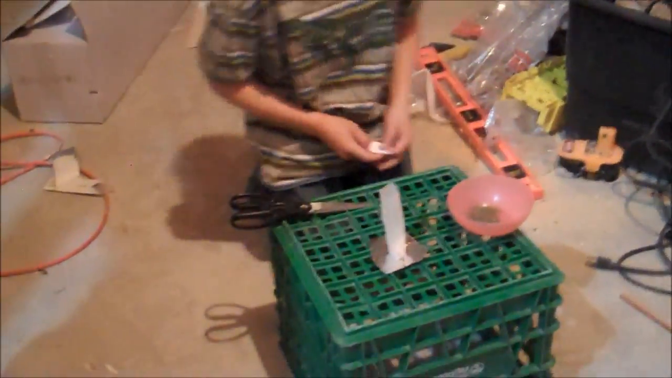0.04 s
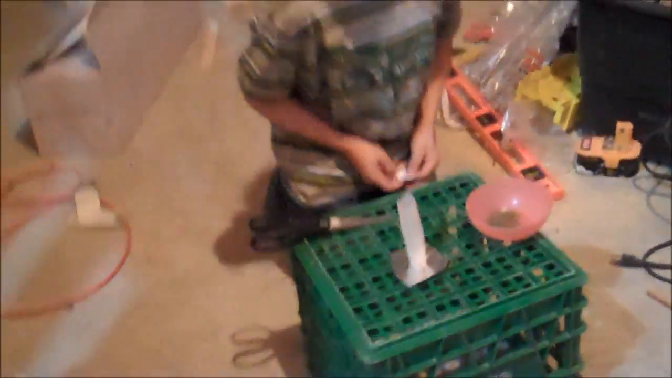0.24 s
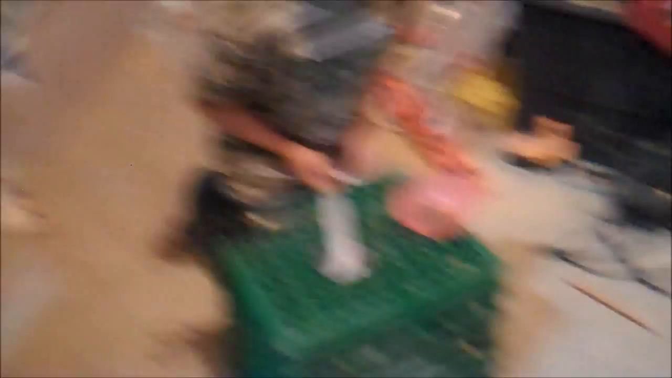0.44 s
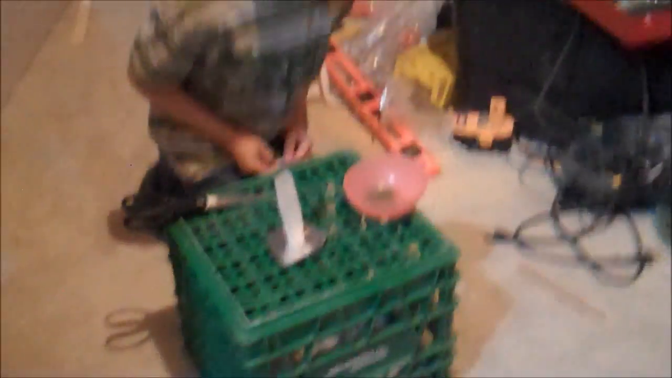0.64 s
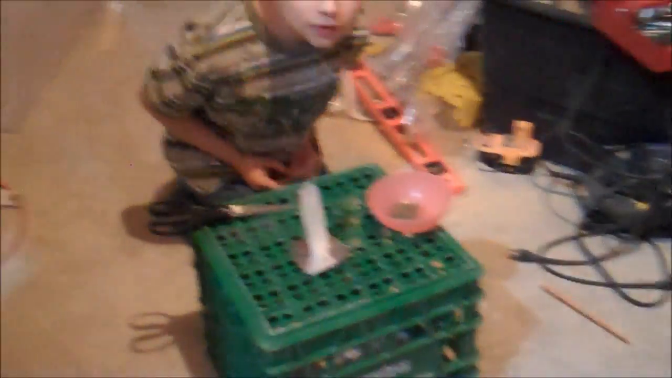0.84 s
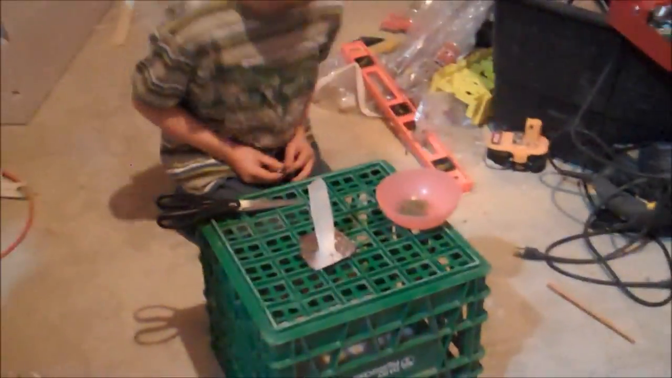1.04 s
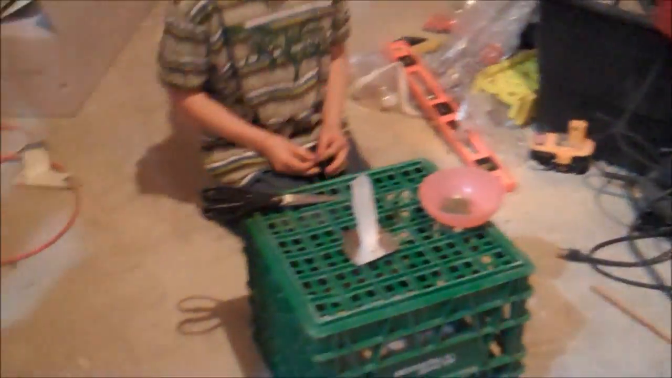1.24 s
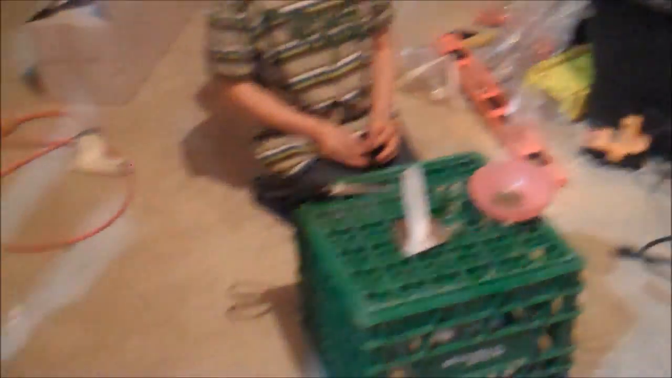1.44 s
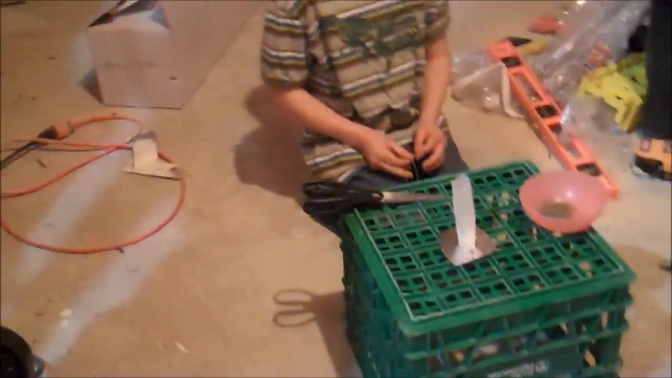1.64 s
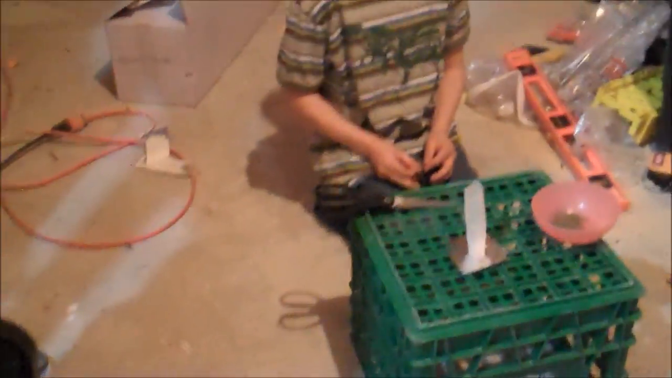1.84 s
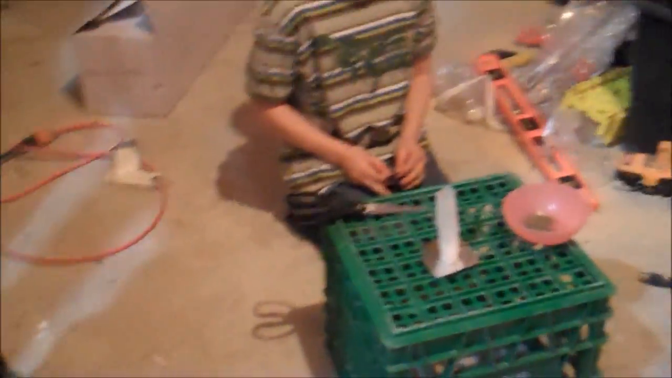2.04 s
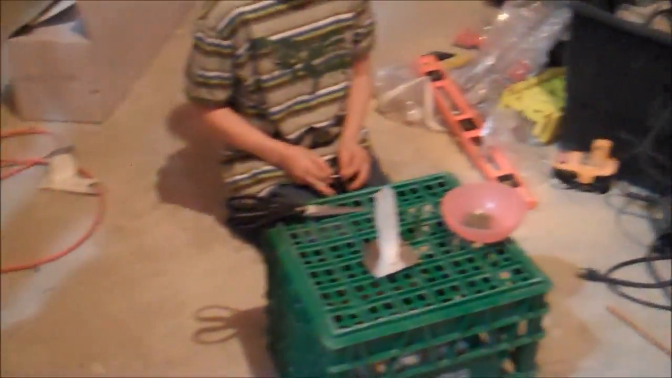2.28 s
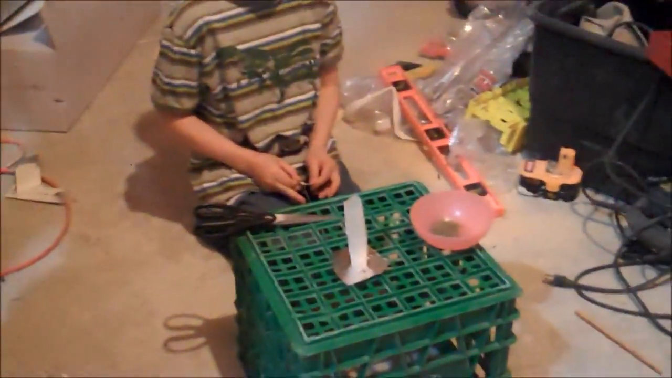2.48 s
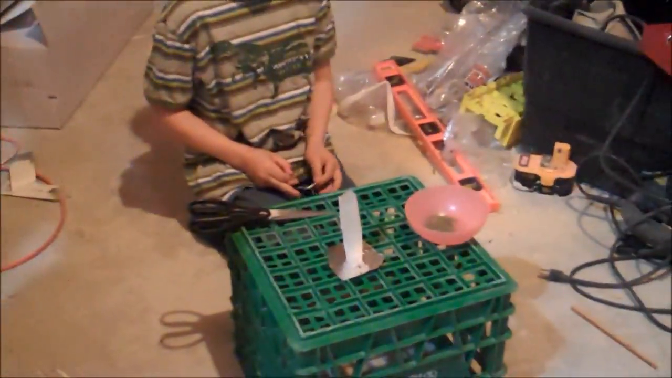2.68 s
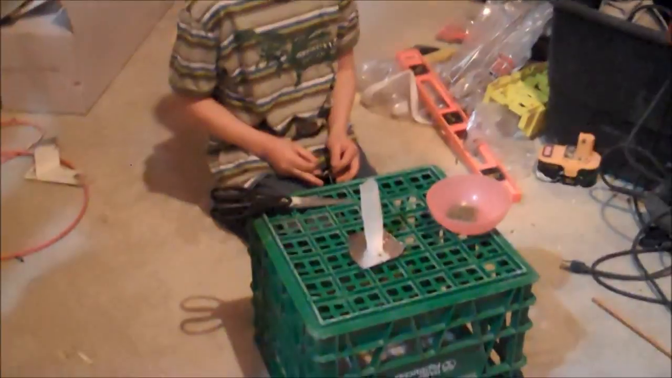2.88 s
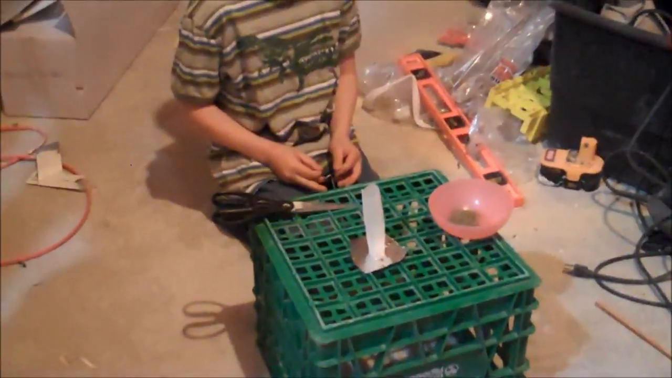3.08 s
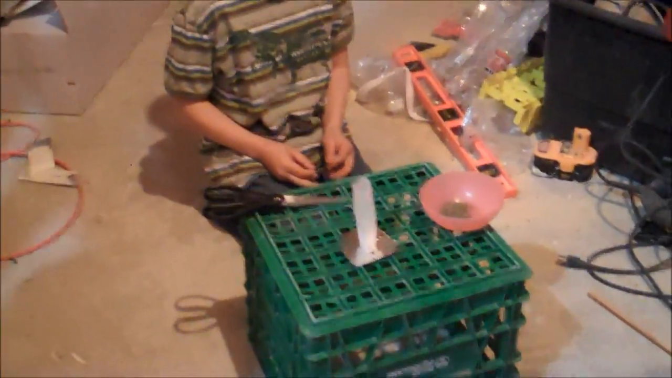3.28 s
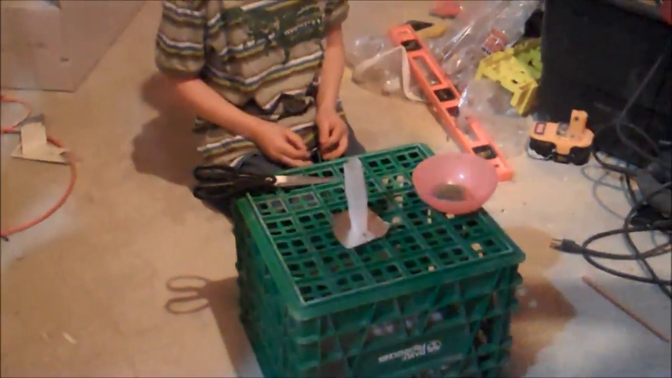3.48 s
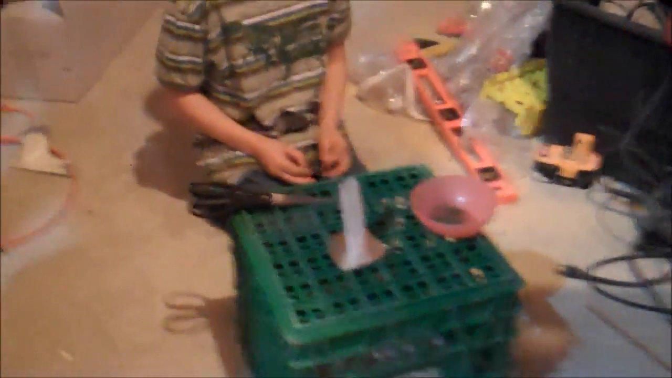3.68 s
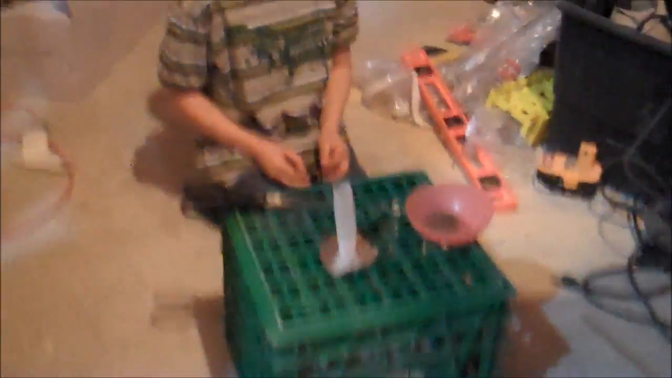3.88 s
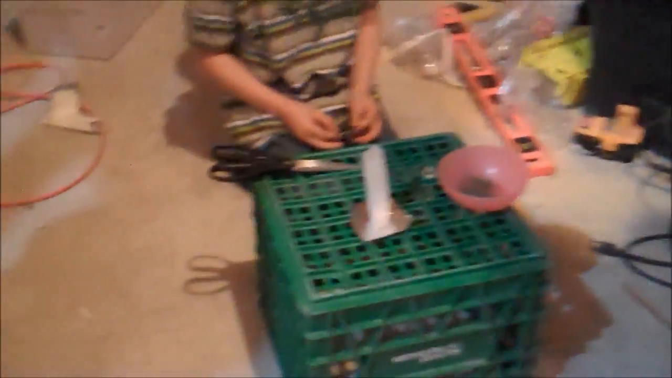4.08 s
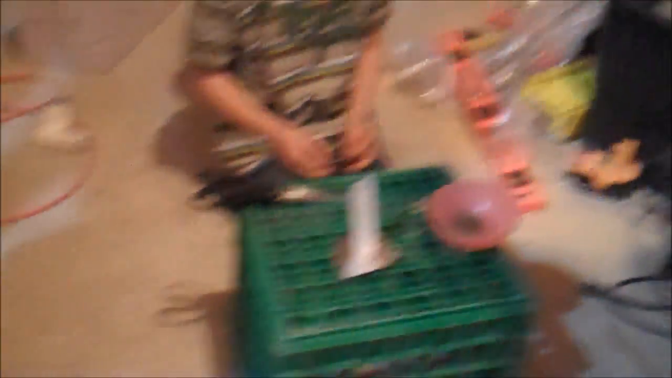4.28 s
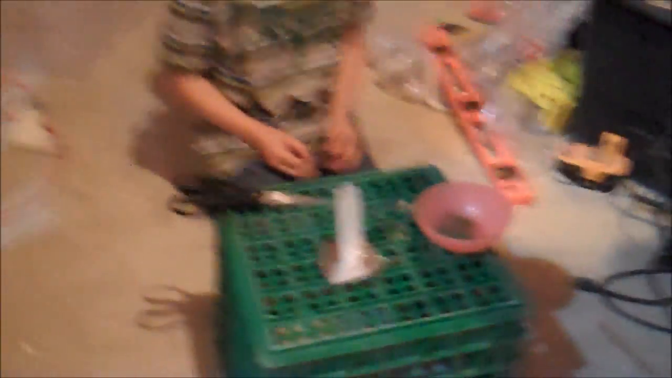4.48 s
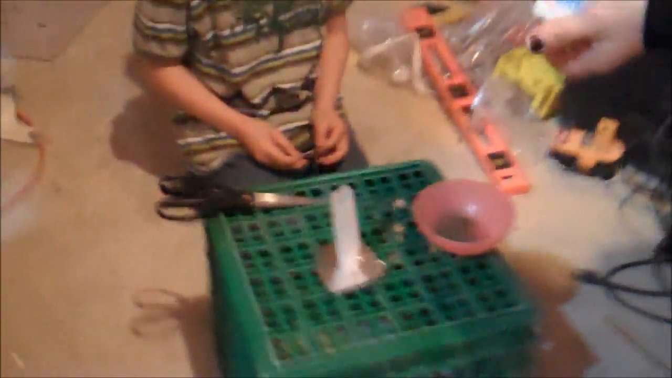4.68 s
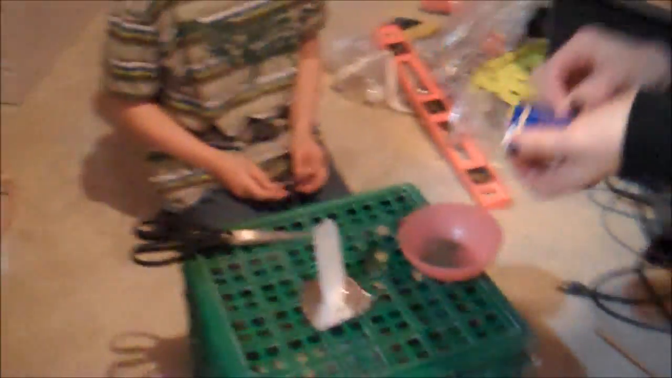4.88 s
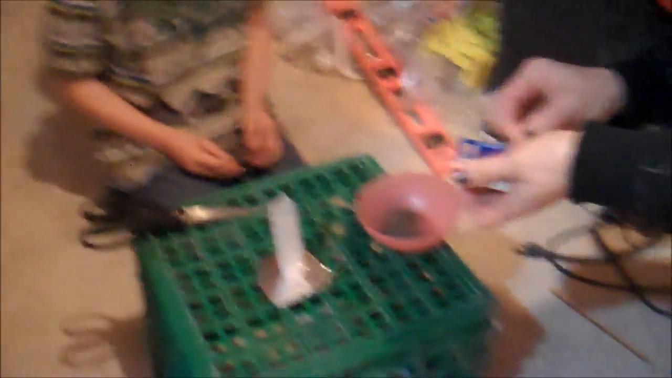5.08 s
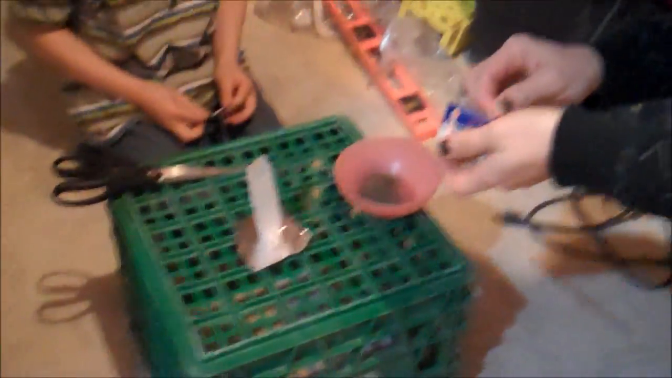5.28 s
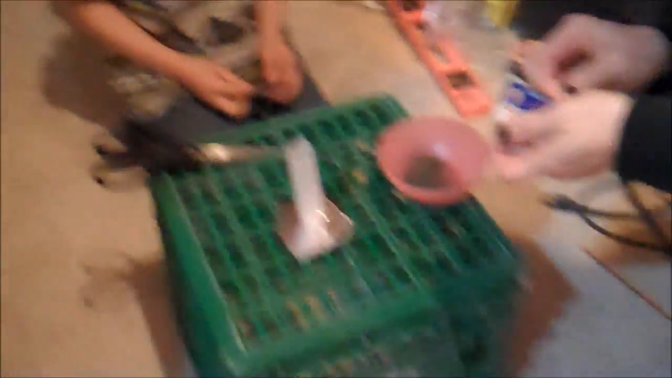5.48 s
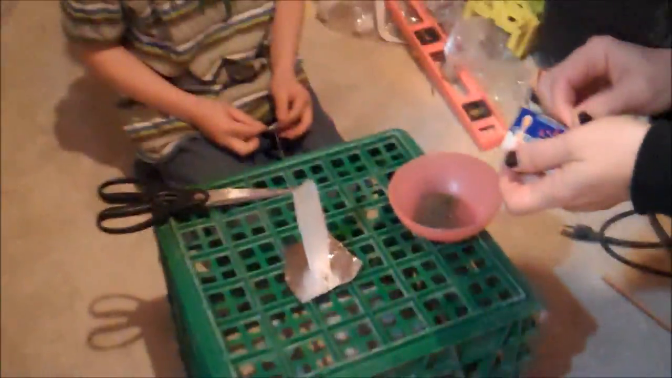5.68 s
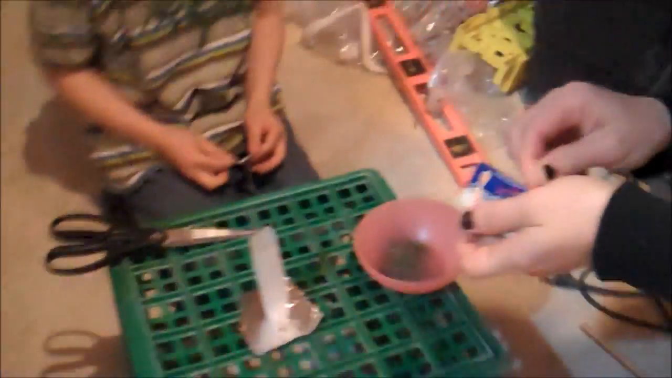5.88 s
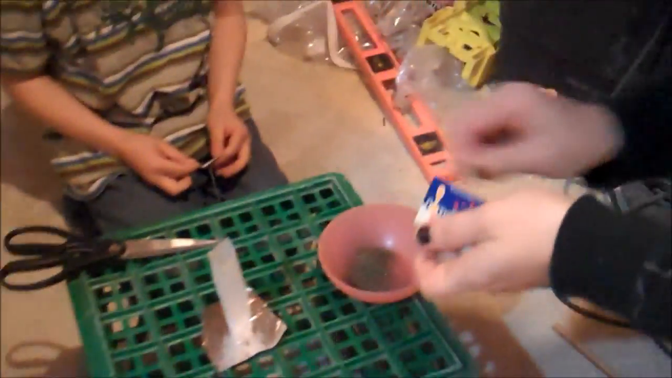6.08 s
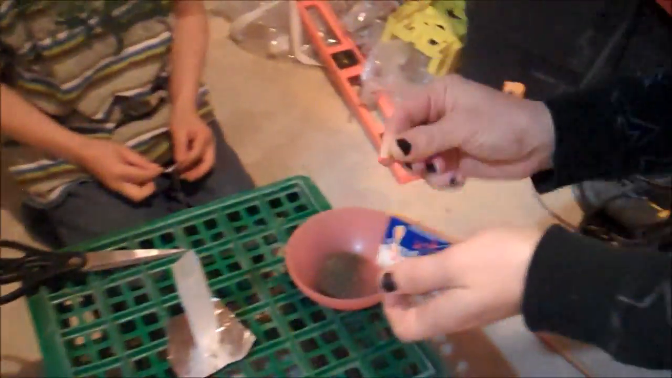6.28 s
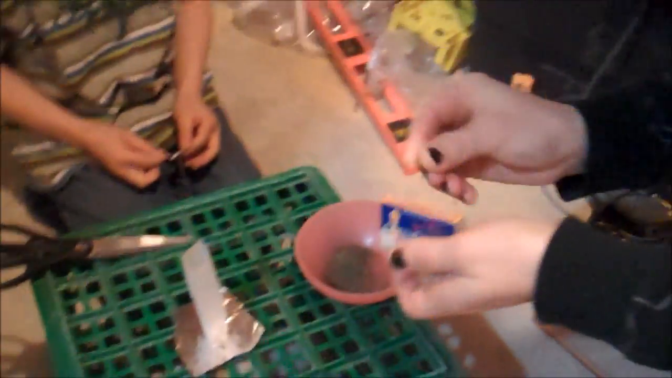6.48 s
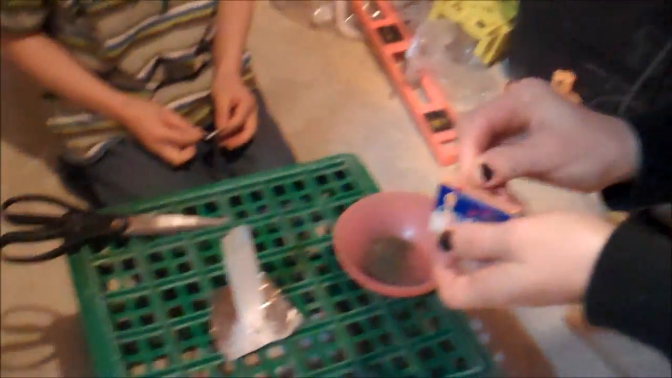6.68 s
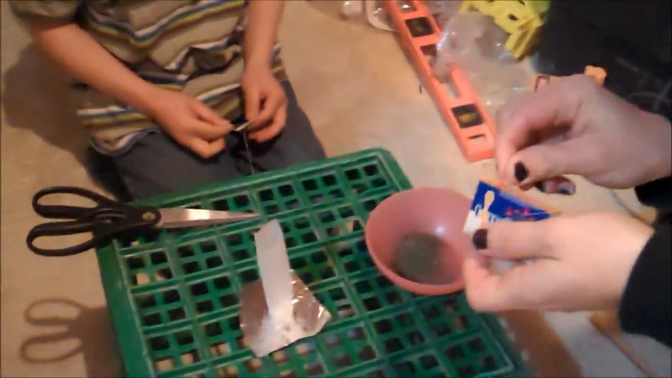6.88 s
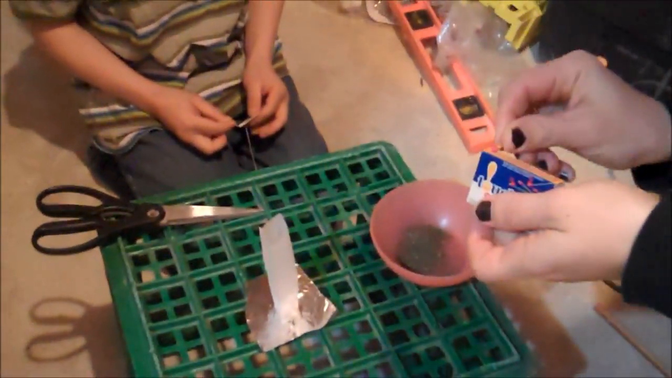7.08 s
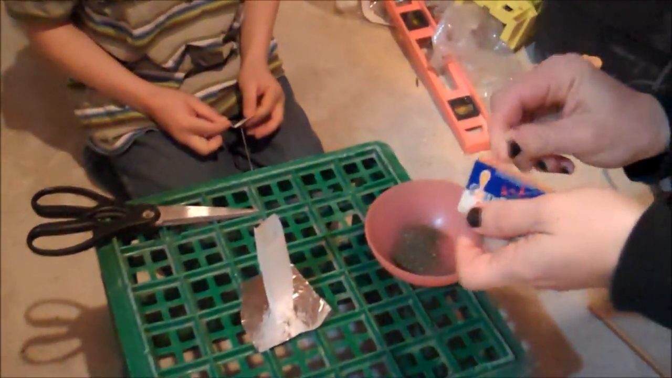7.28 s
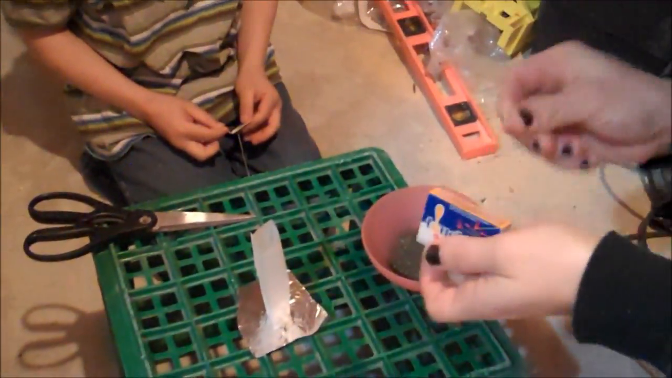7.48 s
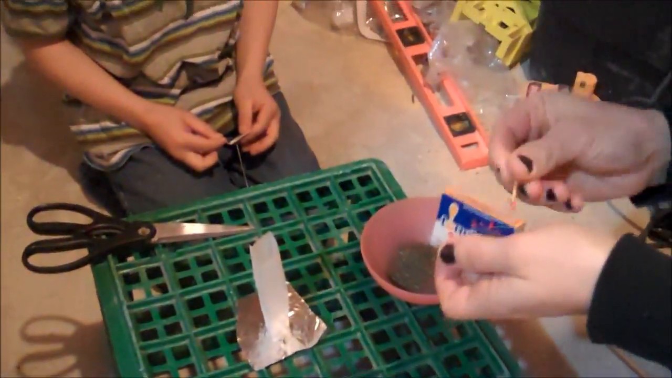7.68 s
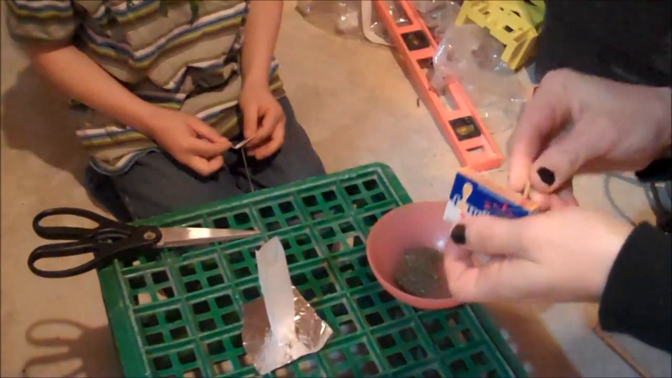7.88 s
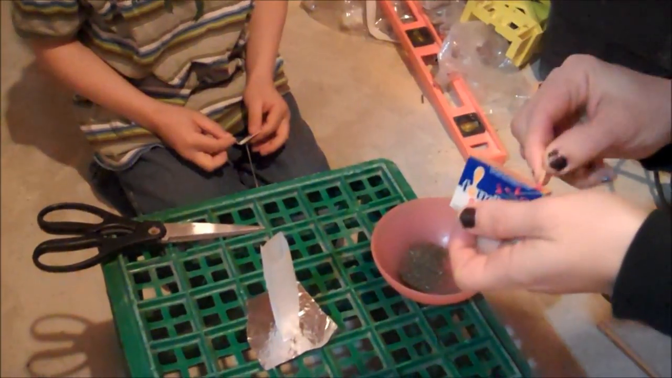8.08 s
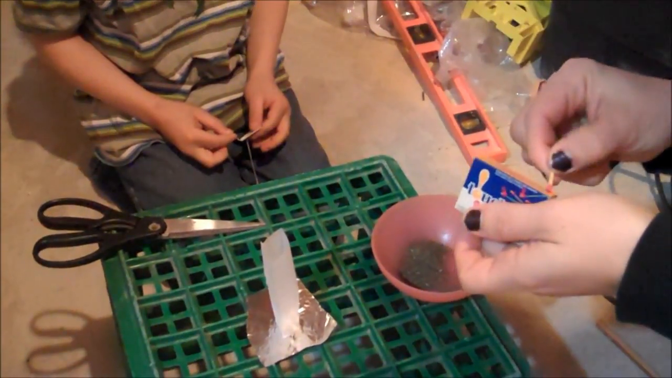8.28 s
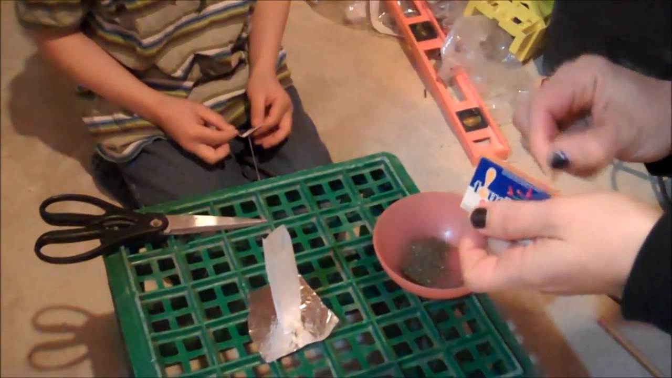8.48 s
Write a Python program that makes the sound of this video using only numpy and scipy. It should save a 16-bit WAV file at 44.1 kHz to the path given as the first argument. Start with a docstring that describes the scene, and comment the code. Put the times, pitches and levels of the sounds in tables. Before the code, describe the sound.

A small matchbox is handled with clicks and rustles, then a match scrapes several times and catches in a quiet room.

```python
"""A quiet bare room: hands and clothes rustle, a small cardboard box ticks, knocks and scuffs.
A match is dragged along the striking strip three times: stick-slip rings the box, the grit hisses,
and the last stroke crackles alight. Weight shifting on the floor thuds below.
Two close microphone ports hear it, their cavity ringing in the treble."""
import sys
import numpy as np
from scipy import signal
from scipy.fft import rfft, irfft
from scipy.io import wavfile
from scipy.ndimage import uniform_filter1d, map_coordinates

SR = 44100
rng = np.random.default_rng(int(sys.argv[2]) if len(sys.argv) > 2 else 0)


def store_pcm(level_fs):
    """Save levels as 16-bit WAV."""
    pcm = np.round(np.clip(level_fs, -1, 1) * 32767).astype(np.int16)
    wavfile.write(sys.argv[1], SR, np.atleast_2d(pcm).T)


N = 376613
T = np.arange(N) / SR
HISS_TOP_HZ = 14300


def undb(db):
    return 10 ** (np.asarray(db) / 20)


def unit(x):
    return x / np.sqrt(np.mean(x ** 2))


def add(out, start_s, x):
    i = int(start_s * SR)
    out[i:i + len(x)] += x[:N - i]


def band(x, hz, width_hz):
    """One resonance, gain 1 at its centre."""
    return signal.lfilter(*signal.iirpeak(hz, hz / min(width_hz, .45 * SR), SR), x)


def steep_band(x, hz, width_hz, widen=1):
    """Two resonances in series, the first optionally wider."""
    return band(band(x, hz, widen * width_hz), hz, width_hz)


def lowpass(x, hz):
    return signal.sosfilt(signal.ellip(12, .2, 90, hz, fs=SR, output="sos"), x)


def highpass(x, hz, order):
    return signal.sosfilt(signal.butter(order, hz, "high", fs=SR, output="sos"), x)


def walk(hz):
    """Random levels held 1 / hz s and slewed."""
    hold = int(SR / hz)
    return uniform_filter1d(np.repeat(rng.standard_normal(N // hold + 1), hold)[:N], hold)


def fade(t60_s, rise_s, samples=None):
    """Linear rise, exponential fall; ends at -60 dB by default."""
    t = T[:samples or int(t60_s * SR)]
    return np.exp(-np.log(1000) * t / t60_s) * np.minimum(t / rise_s, 1)


def grains(spread_db, flicker_db, flicker_hz):
    """Dense contacts of uneven size whose pressure flickers."""
    size = np.minimum(rng.exponential(size=N), 5.5)
    return unit(rng.standard_normal(N) * undb(spread_db * size + flicker_db * walk(flicker_hz)))


def snap(noise, modes, t60_s, rise_s):
    """A noise burst through steep resonances, peak 1."""
    burst = noise * fade(t60_s, rise_s, len(noise))
    ring = sum(undb(db) * steep_band(burst, hz, width, widen=2) / np.sqrt(width)
               for hz, width, db in modes)
    return ring / np.max(np.abs(ring))


def scatter(x, t60_s, rise_s):
    """Reflections that differ at the two ports."""
    env = fade(t60_s, rise_s)
    tail = rng.standard_normal((2, len(env))) * env
    tail /= np.sqrt(np.sum(tail ** 2, axis=1, keepdims=True))
    return signal.fftconvolve(x[None], tail, axes=1)[:, :N]


def room_tone():
    """Steady air and self-noise, alike in both ports only low down, with faint mains hum."""
    # noise spectrum: (frequency [Hz], relative density [dB])
    spectrum = [(25, -6.5), (58, -9.5), (102, -4.5), (183, -6.5), (304, -3), (477, -3.5), (770, -3),
                (1380, -5.5), (1900, -10.5), (2480, -19.5), (9350, -17), (14300, -16.5)]
    air_db, hum_db, hum_hz = -59.5, -80, 120
    hz = np.fft.rfftfreq(N, 1 / SR)
    knot_hz, knot_db = np.transpose(spectrum)
    gain = undb(np.interp(np.log(hz + 1), np.log(knot_hz), knot_db)) * (hz < HISS_TOP_HZ)
    mid, side = rfft(rng.standard_normal((2, N)))
    apart = np.clip(0.62 + hz / 9000, 0, 1)
    port_sign = np.array([[1], [-1]])
    air = unit(irfft(gain * (mid + apart * side * port_sign), N))
    return air * undb(air_db + 1.5 * port_sign) + undb(hum_db) * np.sin(2 * np.pi * hum_hz * T)


def floor_thuds():
    """Shifting weight rings the floor low, with some wobble."""
    # weight shifts: (time [s], level [dB], pitch [Hz], t60 [s])
    shifts = [(0.292, -32.5, 90.6, 0.2), (0.392, -38, 91, 0.28), (2.28, -56, 85.4, 0.33),
              (2.369, -38.5, 227, 0.092), (7.301, -57, 82.4, 0.4)]
    out = np.zeros(N)
    for s, db, hz, t60_s in shifts:
        env = fade(t60_s, rise_s=0.033)
        add(out, s, undb(db) * env * np.sin(2 * np.pi * hz * T[:len(env)]))
    wobble = unit(band(rng.standard_normal(N), hz=22, width_hz=67))
    return out * (1 + 0.59 * wobble)


def rub_gains():
    """Treble, middle and low gain: steady rubbing and bell-shaped swishes add in power."""
    # cloth and finger rubbing: (time [s], treble [dB], middle re treble [dB], low re treble [dB])
    rubbing = [(0, -55, -3.5, -6), (.45, -51, -0.5, -2.5), (.85, -49.5, -7, -14), (1.22, -60, -1.5, -13),
               (2.05, -50.5, -3.5, -11), (2.2, -50, 2.5, -6), (2.75, -51.5, -2, -5.5),
               (2.9, -54.5, -2.5, -12), (3.701, -56.5, -2, -6.5), (3.85, -58, -2.5, -1),
               (4.7, -56.5, -2, -9.5), (5.15, -54.5, 1.5, -11.5), (5.58, -62.5, -4, -7.5),
               (6.22, -64, -4, -1), (6.5, -54.5, -7, -11), (7.19, -62.5, -1, -11), (7.49, -61, -1.5, -3.5),
               (7.65, -54, -3, 4), (8.15, -65.5, 2.5, 0), (8.3, -60.5, 1, 2)]
    # single swishes: (centre [s], length [s], treble [dB], middle re treble [dB])
    swishes = [(0.298, 0.024, -47.5, -12), (0.398, 0.036, -49.5, -1), (0.746, 0.11, -38.5, -5),
               (0.993, 0.15, -47.5, -5.5), (1.159, 0.049, -49, -6), (1.287, 0.067, -48.5, -6),
               (1.377, 0.088, -45, -8), (1.664, 0.057, -41, -14), (1.856, 0.088, -42.5, -6.5),
               (1.942, 0.024, -45, -3.5), (3.204, 0.045, -54.5, 3), (3.369, 0.074, -49.5, -3.5),
               (3.973, 0.084, -51.5, 2.5), (4.165, 0.039, -42.5, -5.5), (4.456, 0.043, -52.5, -3),
               (5.436, 0.11, -52, -8.5), (5.883, 0.056, -50.5, -6.5), (6.137, 0.057, -48.5, -9),
               (6.385, 0.075, -53.5, 1.5), (6.473, 0.097, -51.5, -11), (6.917, 0.038, -51.5, -5)]
    swish_low_db = -17.5  # re treble
    s, treble_db, mid_db, low_db = np.transpose(rubbing)
    power = np.array([undb(2 * np.interp(T, s, treble_db + rel_db)) for rel_db in (0, mid_db, low_db)])
    for s, length_s, db, mid_db in swishes:
        part = slice(int((s - 2 * length_s) * SR), int((s + 2 * length_s) * SR))
        bell = np.exp(-8 * ((T[part] - s) / length_s) ** 2)
        power[:, part] += undb(2 * (db + np.array([[0], [mid_db], [swish_low_db]]))) * bell
    return np.sqrt(power)


def rustle():
    """Grains excite broad, separately flickering resonances; rows: common, left only, right only."""
    # port cavity, fabric, card and body resonances: (centre [Hz], width [Hz], gain row, level [dB])
    modes = [(7110, 1250, 0, -0.5), (5190, 2130, 0, -3), (3650, 1600, 1, -3.5), (2516, 1110, 1, -2),
             (1760, 680, 1, -6.5), (840, 1360, 2, 2)]
    crackle_per_s, crackle_db = 23, 18.5  # lone fibres and match sticks
    gains = rub_gains()
    contacts = grains(spread_db=4.2, flicker_db=3, flicker_hz=70)
    crackle = (rng.random(N) < crackle_per_s / SR) * rng.standard_normal(N) * undb(crackle_db)
    out = 0
    for hz, width_hz, row, db in modes:
        drive = np.sqrt(0.5) * np.array([contacts + crackle, *rng.standard_normal((2, N))])
        drive *= undb(2.9 * walk(hz=45))
        rub = steep_band(drive, hz, 1.36 * width_hz) * np.sqrt(SR / 2 / width_hz)
        out += rub * gains[row] * undb(db)
    return lowpass(out, HISS_TOP_HZ)


def knocks():
    """Soft blows on cardboard or wood: a noisy push through one broad mode."""
    # blows: (time [s], peak [dB], pitch [Hz], t60 [s])
    blows = [(0.054, -39, 666, 0.0083), (0.111, -32, 1470, 0.0057), (0.143, -36, 845, 0.016),
             (0.283, -40.5, 241, 0.012), (0.38, -37, 840, 0.042), (0.401, -26.5, 1060, 0.011),
             (0.443, -35, 950, 0.023), (1.161, -38, 2040, 0.092), (1.4657, -16, 5200, 0.013),
             (1.487, -33, 1130, 0.093), (2.136, -45.5, 465, 0.13), (2.152, -38, 676, 0.11),
             (3.759, -34.5, 350, 0.03), (3.862, -38.5, 1110, 0.042), (3.92, -40.5, 1500, 0.037),
             (3.967, -38.5, 1250, 0.083), (4.122, -32, 1080, 0.018), (4.153, -32.5, 1140, 0.0032),
             (4.231, -40, 650, 0.028), (4.415, -36.5, 1150, 0.077), (5.051, -32, 1760, 0.038),
             (5.677, -46, 320, 0.09), (5.9, -39.5, 780, 0.013), (6.886, -38, 1500, 0.061),
             (6.948, -35.5, 600, 0.0055), (6.971, -30.5, 676, 0.15), (7.325, -28, 7100, .012),
             (7.865, -44, 297, 0.049), (8.262, -36, 1990, 0.11), (8.416, -28.5, 2120, 0.08),
             (8.473, -22, 1970, 0.021), (8.534, -19, 4460, 0.0089)]
    out = np.zeros(N)
    for s, db, hz, t60_s in blows:
        mode = (hz, 16.3 * np.sqrt(hz), 0)
        add(out, s, undb(db) * snap(rng.standard_normal(4000), [mode], t60_s, rise_s=0.0014))
    return out


def scuffs():
    """Dying bursts of coarse grains: bright grit, a card resonance and a dull body."""
    # bursts: (time [s], level [dB], body re grit [dB], t60 [s], card mode [Hz], card re grit [dB])
    bursts = [(1.4222, -16.5, -12.5, 0.13, 2390, -1), (1.463, -21, -14.5, 0.27, 2830, -4),
              (1.515, -24.5, -19, 0.12, 2640, -6), (1.864, -31.5, -8, 0.21, 2870, 3),
              (2.163, -29, -12, 0.11, 2850, 9), (3.772, -43.5, 1, 0.27, 3670, 5.5),
              (3.952, -33.5, -41, 0.088, 2270, 4.5), (4.153, -39.5, -2, 0.29, 4150, -22),
              (6.0046, -23.5, -14.5, 0.1, 2260, -3), (6.882, -40, -30, 0.11, 3800, 8.5),
              (6.971, -26.5, -6, 0.25, 3280, -10)]
    rub = lowpass(grains(spread_db=5.2, flicker_db=0.77, flicker_hz=120), HISS_TOP_HZ)
    grit = undb(14) * band(band(rub, 5400, 1300), 5100, 840)
    grit += undb(10) * steep_band(rub, 6400, 2200) + undb(9.5) * steep_band(rub, 3160, 1500)
    body = steep_band(rub, 1000, 670)
    out = np.zeros(N)
    for s, db, body_db, t60_s, hz, card_db in bursts:
        env = fade(t60_s, rise_s=0.00041)
        part = slice(int(s * SR), int(s * SR) + len(env))
        card = band(band(rub[part], hz, 0.56 * hz), hz, 0.36 * hz)
        scuff = unit(grit[part]) + undb(body_db) * unit(body[part]) + undb(card_db) * unit(card)
        add(out, s, undb(db) * env * scuff / 3)  # grain peaks are about 3 x rms
    return out


def ticks():
    """Dry snaps ring the treble resonances and the box; fingers close by smear a short tail."""
    # snaps: (time [s], treble peak [dB], box re treble [dB])
    snaps = [(1.4255, -23, -12), (1.429, -28, -13), (1.516, -25, -14), (1.532, -33, -10), (1.655, -34.5, 6),
             (2.0623, -33, -20), (2.167, -41, 4), (2.343, -48, 10), (2.673, -23, -32), (3.712, -31.5, -9),
             (3.9502, -23, -20), (4.809, -19, -15), (4.914, -50.5, 10.5), (5.0746, -26, -7),
             (5.131, -41.5, 7), (5.14, -38, -20), (5.164, -19.5, -16.5), (5.186, -30, -11),
             (5.213, -32, -29.5), (5.247, -33, -29), (5.257, -17, -44), (5.261, -18.5, -41),
             (5.2904, -27.5, -27), (5.318, -33, -6), (5.676, -37, -5), (5.82, -37.5, -7),
             (5.8748, -17.5, -50), (5.951, -31, -33), (6.04, -24, 2.5), (6.2626, -30.5, -28),
             (6.29, -37, -26), (6.493, -23.5, -17), (6.5207, -23.5, -10), (6.564, -30.5, -17),
             (6.6447, -35, 6), (6.7552, -33, -27), (6.8166, -29.5, -14), (6.9762, -18, -7),
             (7.403, -35.5, -11), (8.479, -12, -8), (8.484, -10, -11), (8.487, -14, -11)]
    # treble resonances: (centre [Hz], width [Hz], level [dB])
    modes = [(5200, 830, 6), (7310, 1570, 23), (12250, 1900, 6.5)]
    out = np.zeros(N)
    for s, db, box_db in snaps:
        noise, tail_noise = rng.standard_normal((2, 1500))
        treble = snap(noise, modes, t60_s=0.0018, rise_s=0.0001)
        tail = snap(tail_noise, modes[:2], t60_s=0.042, rise_s=0.0023)
        box = snap(noise, [(2870, 3800, 0)], t60_s=0.026, rise_s=0.000083)
        add(out, s, undb(db) * (treble + undb(-14.5) * tail + undb(box_db) * box))
    return out


def card_chatter():
    """Uneven slips drive a narrow, gliding resonance of a card wall; each note swells and fades."""
    # notes: (start [s], end [s], start pitch [Hz], end pitch [Hz], level [dB])
    glides = [(.7, 0.79, 1750, 1910, -38.5), (2.194, 2.312, 2080, 2150, -46), (2.36, 2.45, 2440, 2350, -50),
              (3.02, 3.084, 2400, 1850, -51), (3.432, 3.571, 2480, 2000, -49),
              (4.984, 5.065, 2296, 2500, -51), (5.123, 5.202, 2385, 2260, -49),
              (6.006, 6.009, 2580, 1410, -23), (6.017, 6.036, 1935, 2660, -32),
              (6.043, 6.062, 2960, 2970, -33.5), (8.438, 8.446, 2490, 2280, -40),
              (8.451, 8.47, 2490, 1720, -29.5), (8.498, 8.534, 2143, 1680, -31)]
    width_hz, overtone_db = 400, -11
    slips = signal.lfilter(*signal.butter(2, width_hz / 2, fs=SR), rng.standard_normal((2, N)))
    slips /= np.std(slips)
    out = np.zeros(N)
    for start_s, end_s, start_hz, end_hz, db in glides:
        part = slice(int(start_s * SR), int(end_s * SR))
        progress = (T[part] - start_s) / (end_s - start_s)
        phase = 2 * np.pi * np.cumsum(start_hz + (end_hz - start_hz) * progress) / SR
        steady = min(1.3, .02 / (end_s - start_s))  # short notes hold, long ones break up
        note = (steady + slips[0, part]) * np.sin(phase) + slips[1, part] * np.cos(phase)
        note += undb(overtone_db) * slips[1, part] * np.sin(2 * phase)
        swell = np.sqrt(np.abs(np.sin(np.pi * progress)))
        out[part] += undb(db) * swell * note / 2
    return out


def squeals():
    """The slip locks to the lowest box mode, grows with overtones and lets go at once."""
    # locked slips: (release [s], level [dB], pitch [Hz], growth time [s])
    locks = [(7.2762, -24, 1860, 0.0035), (7.2822, -20, 1624, 0.0083), (7.29, -15, 1774, 0.0068)]
    t = np.arange(-800, 60) / SR
    out = np.zeros(N)
    for s, db, hz, growth_s in locks:
        env = np.where(t < 0, np.exp(t / growth_s), np.exp(-t / 0.00066))
        tone = sum(0.29 ** k * np.sin(2 * np.pi * (k + 1) * hz * t) for k in range(4))
        add(out, s + t[0], undb(db) * env * tone)
    return out


def slip_ring(slip, modes):
    """Stick-slip through resonances of alternating sign, rms 1."""
    return unit(sum((-1) ** k * undb(db) * steep_band(slip, hz, width_hz, widen=3)
                    for k, (hz, width_hz, db) in enumerate(modes)))


def match_strokes():
    """Stick-slip rings the box under the hiss of the strip's grit; at last the head catches and flares."""
    # tray slide, then three strokes (the second bites twice): (start [s], end [s],
    # box at start [dB], box at end [dB], grit at start [dB], grit at end [dB], release t60 [s])
    strokes = [(4.93, 5.062, -50.5, -47.5, -64, -41.5, .02), (6.001, 6.066, -38, -37.5, -53, -36, 0.097),
               (7.246, 7.268, -29, -35.5, -32.5, -41.5, 0.03), (7.266, 7.294, -28, -32, -38, -36, 0.13),
               (8.426, 8.538, -43.5, -27.5, -51, -35, .05)]
    # box and grit resonances: (centre [Hz], width [Hz], level [dB])
    box_modes = [(1675, 640, 1.5), (2450, 460, 2.5), (3050, 600, -2.5), (4200, 610, -4.5)]
    grit_modes = [(5030, 830, -1.5), (7370, 1100, 5.5), (11200, 5100, -16.5)]
    bite_s, hollow_hz, hollow_db = 0.0054, 1080, -27
    flare_s, flare_db, flare_t60_s = 8.4795, -25, 0.14
    slip = grains(spread_db=3.2, flicker_db=2.5, flicker_hz=220)
    box = slip_ring(slip, box_modes) + undb(hollow_db) * unit(steep_band(slip, hollow_hz, 600))
    grit = slip_ring(slip, grit_modes)
    flare = grit * undb(flare_db - 60 * np.abs(T - flare_s) / flare_t60_s) * (T > flare_s)
    out = np.zeros(N)
    for start_s, end_s, box_db, box_end_db, grit_db, grit_end_db, t60_s in strokes:
        bite = np.clip((T - start_s) / bite_s, 0, 1)
        release = undb(-60 * np.maximum(T - end_s, 0) / t60_s)
        box_gain = undb(np.interp(T, (start_s, end_s), (box_db, box_end_db)))
        grit_gain = undb(np.interp(T, (start_s, end_s), (grit_db, grit_end_db)))
        out += bite * release * (box * box_gain + grit * grit_gain)
    return lowpass(out + flare, HISS_TOP_HZ)


def ports(near, cloth_sides):
    """Sound reaches the left port later; hands and housing scatter it and shade the right port."""
    # source direction: (time [s], left lag [ms], left re right [dB], extra treble left re right [dB])
    direction = [(0, 0.17, 0.5, 16.5), (1.5, .15, 0.5, 3.5), (2.6, 0.16, 2.5, 11.5),
                 (2.68, 0.055, 1.5, 12.5), (6.0, 0.051, 1.5, 15.5), (8.54, 0.047, 3, 10.5)]
    s, *columns = np.transpose(direction)
    lag_ms, pan_db, shade_db = (np.interp(T, s, column) for column in columns)
    late = map_coordinates(near, [np.arange(N) - lag_ms * SR / 1000], order=3, mode="nearest")
    scattered = scatter(band(near, 11900, 13500), t60_s=0.0024, rise_s=0.000067)
    both = np.array([late, near]) + cloth_sides + undb(-2) * scattered
    treble = highpass(both, 8000, order=1)
    both += treble * (undb([shade_db / 2, -shade_db / 2]) - 1)
    both *= undb([pan_db / 2, -pan_db / 2])
    both[1] -= 0.33 * highpass(both[1], 10500, order=2)
    return both


def scene():
    """Close handling, its duller tail from the bare walls, the floor and the room tone."""
    cloth, floor = rustle(), floor_thuds()
    near = cloth[0] + match_strokes() + squeals() + card_chatter() + ticks() + scuffs() + knocks()
    direct = ports(near, cloth[1:])
    walls = scatter(steep_band(near, 2800, 6500), t60_s=0.25, rise_s=0.013)
    floor_tail = scatter(floor, t60_s=0.072, rise_s=0.0043)
    return direct + undb(-14) * walls + floor + undb(-1) * floor_tail + room_tone()


def record(dry):
    """A soft limiter rounds the loudest cracks; a low-pass cuts the top."""
    return lowpass(.75 * np.tanh(dry / .75), hz=16300)


dry = scene()
out = record(dry)
store_pcm(out)
```